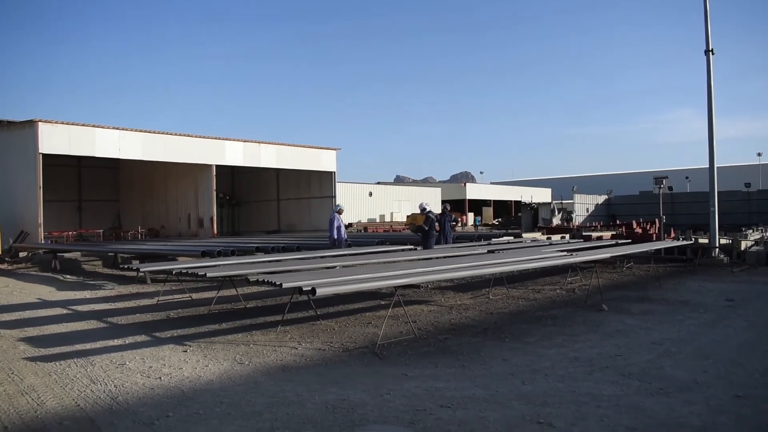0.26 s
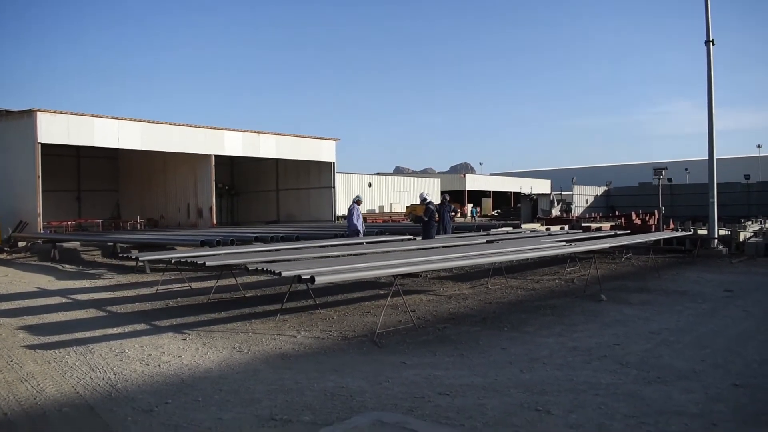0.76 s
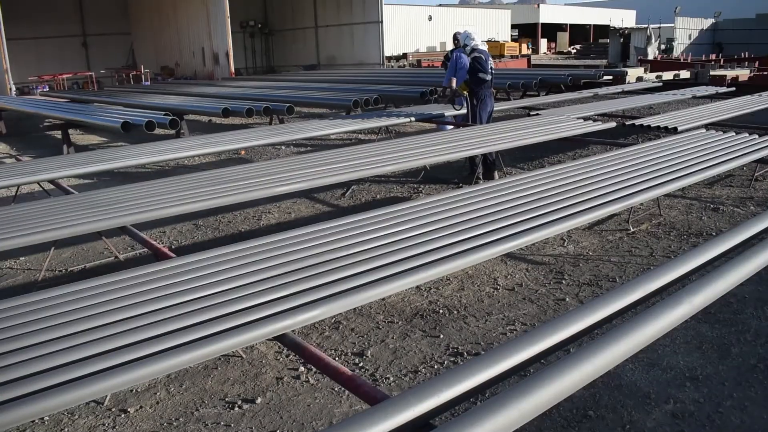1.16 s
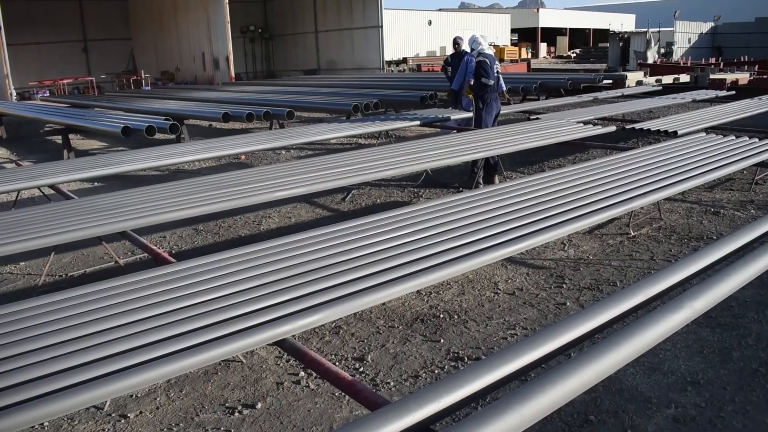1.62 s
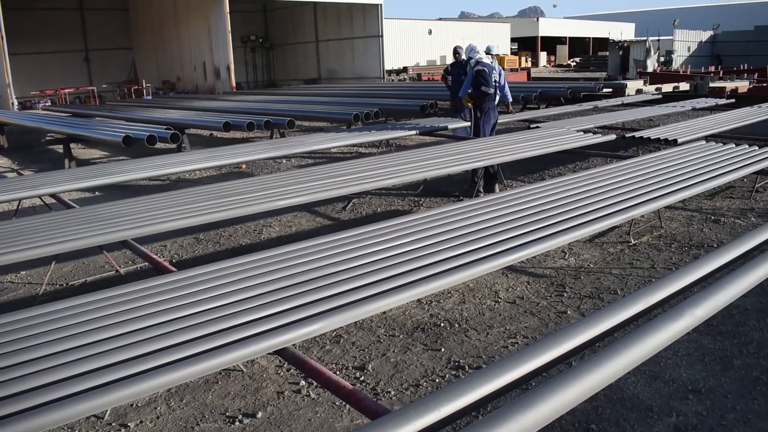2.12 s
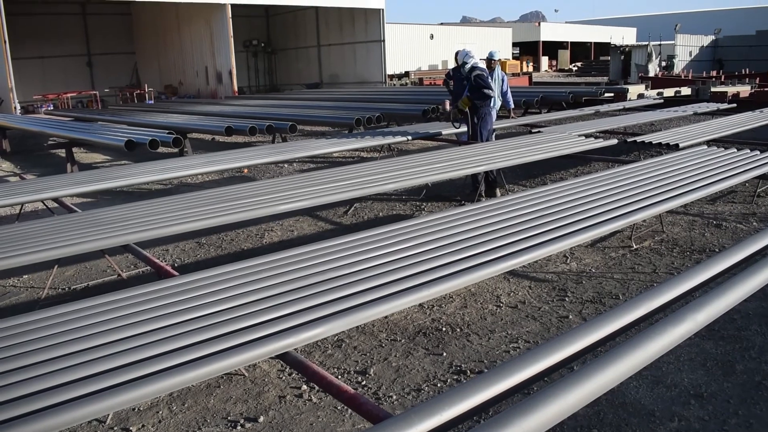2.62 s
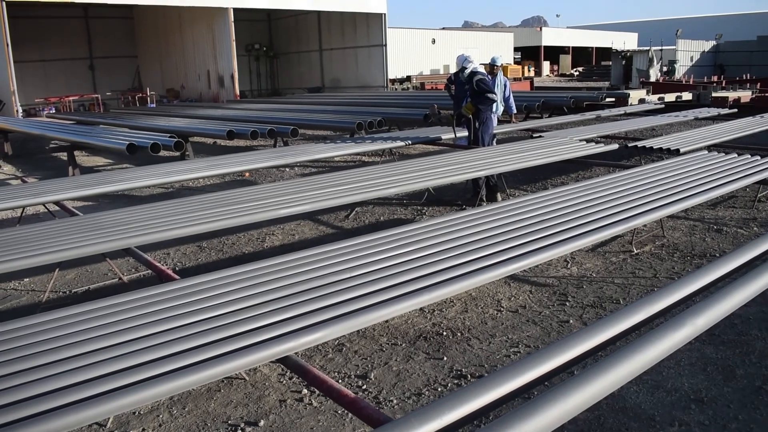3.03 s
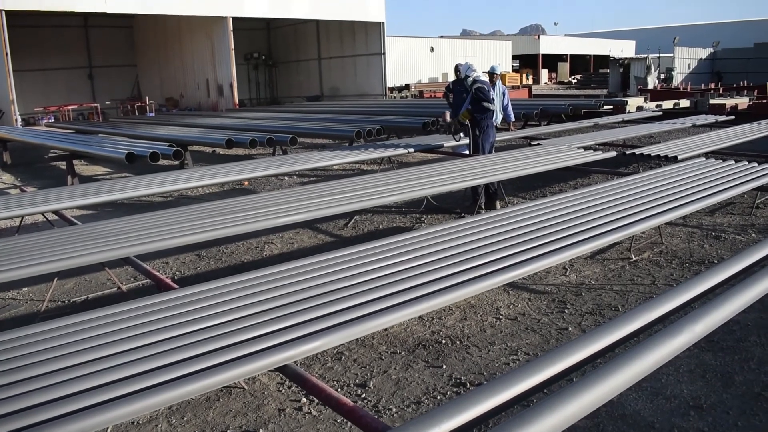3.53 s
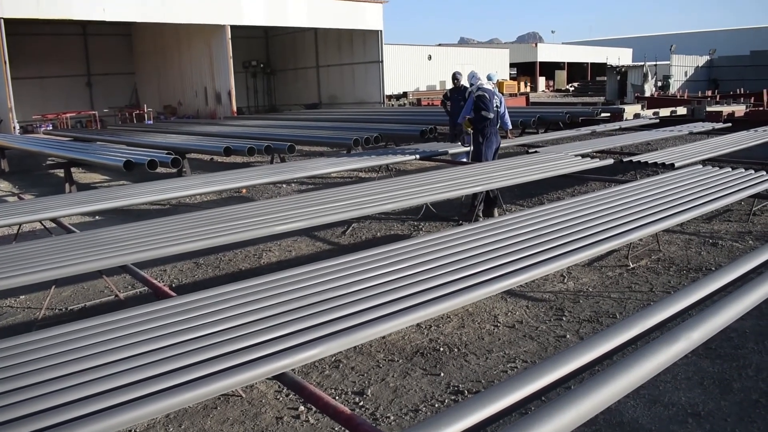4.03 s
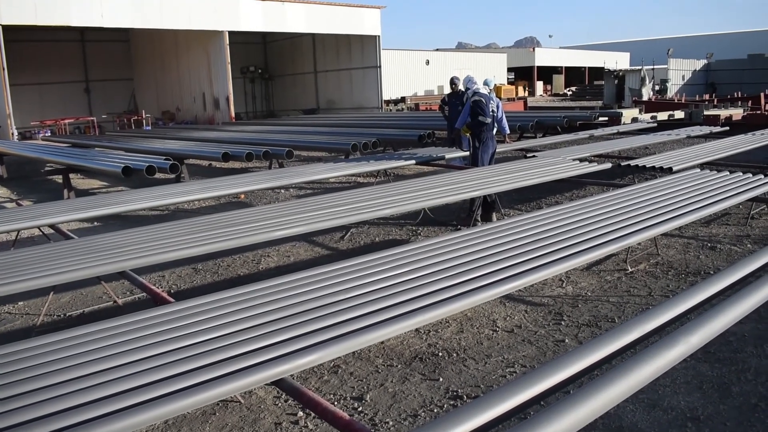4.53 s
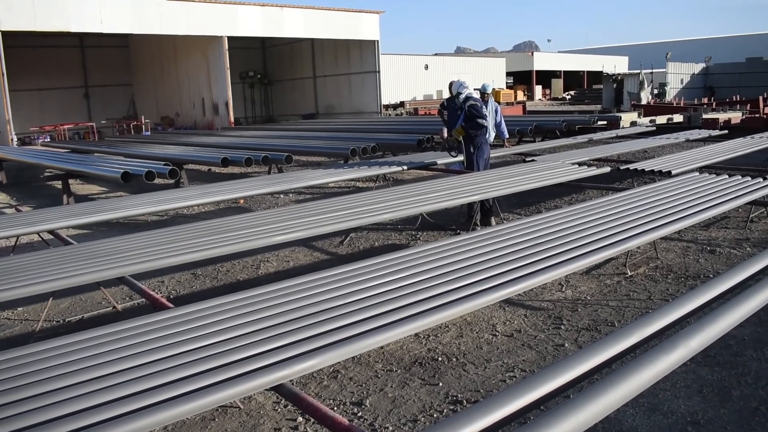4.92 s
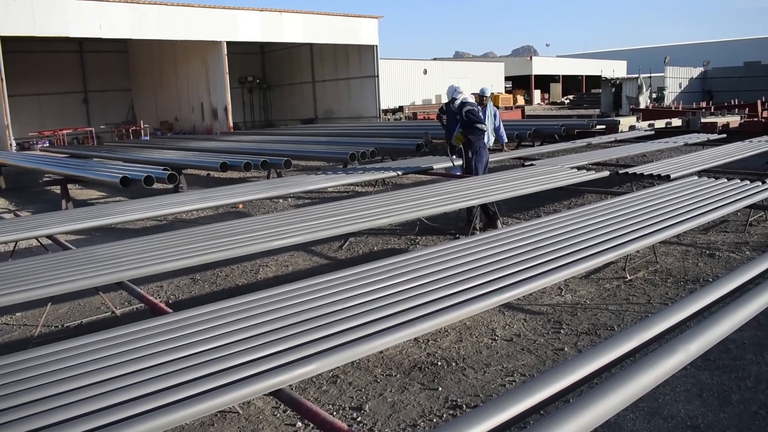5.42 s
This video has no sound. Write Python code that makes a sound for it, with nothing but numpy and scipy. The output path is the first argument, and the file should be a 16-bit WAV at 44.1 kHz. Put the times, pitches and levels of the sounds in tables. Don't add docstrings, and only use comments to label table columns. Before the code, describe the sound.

Low outdoor machinery drone and a few dull metal taps, a blink of silence, then continuous bright pressurized spraying over steel pipes.

```python
import sys
import numpy as np
from scipy import signal
from scipy.fft import dct
from scipy.io import wavfile
from scipy.ndimage import uniform_filter1d

SR = 44100
rng = np.random.default_rng(int(sys.argv[2]) if len(sys.argv) > 2 else 0)


def dump_mix(stems):
    frames = np.atleast_2d(stems).T
    limited = np.clip(frames, -1, 1)
    pcm = np.round(limited * 32767).astype(np.int16)
    wavfile.write(sys.argv[1], SR, pcm)


def voltage_ratio(decibels):
    exponent = np.asarray(decibels, float) / 20
    return 10 ** exponent


N = 249606
HOP = 256
CUT_S = 0.94

# pitch_hz, level_db (per Hz)
YARD_COLOUR = [(70, -15), (180, -3.5), (500, -5.5), (950, -6.5), (1260, -4), (2200, -12), (2900, -13),
               (3030, -18), (4000, -20.5), (6000, -15), (8600, -15), (9500, -25.5), (11000, -35.5),
               (15500, -43.4)]
# pitch_hz, width_hz, level_db, near_change_db
WHISTLES = [(309, 18, -62.5, 2), (348, 9, -55, -3.5), (442, 19, -59, -22), (771, 31, -58, 2.5),
            (2600, 40, -65, 0), (2840, 8, -62, -3)]
# db_per_db of aim, of strike, of mist
HUM_DUCK = [-.8, .85, -.25]
# db_per_db of aim, of strike, of mist
RUMBLE_DUCK = [-.27, .93, -.55]
# middle_s, low_hz, high_hz, level_db (against the band)
REFILLS = [(.095, 4700, 6400, -3), (.095, 6900, 8300, -2), (.095, 10400, 11800, -8), (.304, 4700, 6400, -5),
           (.304, 7600, 9700, -4), (1.396, 5160, 7600, -2), (1.396, 10300, 11800, -2),
           (1.442, 4700, 5800, -2), (1.442, 9600, 11800, -3), (3.625, 10300, 11800, -4),
           (5.320, 6930, 9700, -4), (5.483, 8300, 9700, -3)]
# middle_s, leak_db (of lost parts), first_tone_hz, second_tone_hz
THIN_MOMENTS = [(.528, -18, 7720, 5900), (.656, -19, 1110, 4560), (1.080, -18, 1660, 3130),
                (1.276, -18, 4680, 3230), (1.511, -13, 4850, 5700), (1.681, -18, 8900, 2360),
                (1.723, -21, 4830, 3260), (2.278, -15, 9620, 1800), (2.315, -16, 2150, 4350),
                (2.401, -25, 3150, 9070), (2.531, -22, 10370, 4560), (2.556, -18, 2290, 8600),
                (2.746, -25, 3140, 4200), (2.915, -20, 2260, 4770), (3.021, -20, 3300, 2270),
                (3.213, -11, 4670, 2836), (3.232, -28, 2130, 1600), (3.341, -14, 3090, 4800),
                (3.43, -20, 3920, 5070), (4.024, -18, 3920, 3280), (4.105, -44, 4400, 2140),
                (4.283, -17, 4410, 2420), (4.794, -15, 5640, 4800), (4.834, -20, 2340, 1675),
                (4.859, -18, 4890, 3650), (4.985, -16, 4400, 2250), (5.008, -25, 4770, 2120),
                (5.133, -24, 5380, 2390), (5.282, -19, 2950, 4820), (5.432, -18, 4530, 5260)]
LOUD_TONES_HZ = [2250, 3250, 3900, 4350, 4800, 5550, 8800]
# start_s, level_db, pitch_hz, fade_s (time to fall 60 dB)
KNOCKS = [
    (.581, -37, 1130, .04),
    (.596, -33, 1150, .04),
    (.654, -38, 1050, 0.044),
    (.811, -34, 1250, 0.049),
    (.814, -37, 704, 0.036),
    (.814, -37, 2420, .03),
]
# time_s, level_db
SCENE_CHANGE = [
    (.899, 0),
    (.8995, -21),
    (.927, -38),
    (.929, -70),
    (.954, -75),
    (.957, -43),
    (.966, -22),
    (.975, -13),
    (0.992, -3.5),
]
# time_s, aim_db (toward the microphone), strike_db (on the pipes), mist_db (thrown back)
GUN_SWEEP = [(1.0, .7, -2.4, 2.7), (1.3, .8, .2, 1.2), (1.5, -.7, 2.3, .6), (1.79, -1.8, -.2, -1.9),
             (1.99, -3.5, -1.3, -1.5), (2.29, -1.7, .9, -2.2), (2.48, 2.2, 1.8, 4.2), (2.77, 1.7, 1.3, 2.6),
             (2.93, 1.2, -2.3, .2), (3.28, 1.9, -1.9, -.1), (3.77, .3, 1.1, 3.2), (4.07, -.2, 2.4, -1.6),
             (4.26, -2.3, -.9, -1.9), (4.56, -2.4, -1.5, -4.9), (4.78, -1.3, .4, -3.6),
             (4.88, 1.4, 1.7, 2.2), (5.06, 2.7, -.7, 1.3), (5.65, 1.8, -1.1, -.5)]
# pitch_hz, level_db (per Hz)
JET_COLOUR = [(400, -31), (750, -19.5), (1220, -25.5), (1700, -13.5), (2260, -11.5), (3200, -11),
              (4100, -9), (5400, -11.5), (6300, -6), (6900, -2.12), (8400, -6.5), (9300, -14.5),
              (10600, -18.0), (15500, -36)]
# low_hz, high_hz, db_per_db of aim, of strike, of mist
REGIONS = [(770, 1400, -1.3, .4, .01), (1400, 2600, -.7, .65, -.08), (2600, 5900, -1.08, 1.08, .01),
           (9400, 11500, -1.05, .03, 1.05), (11500, 30000, -.27, .22, .35)]
# pitch_hz, width_hz, depth_db
JET_DIPS = [(2000, 72, -9), (2616, 175, -10.5), (3650, 120, -3), (4500, 130, -3.5), (5800, 175, -4),
            (9340, 220, -4.5), (11800, 300, -4), (12800, 200, -6)]
# pitch_hz, width_hz, level_db, db_per_db of aim, db_per_db of strike
PIPE_RINGS = [(6820, 350, 2.3, .4, -.3), (8300, 700, .01, -.15, .1), (10400, 280, -.5, .01, .3),
              (4220, 150, .6, -.8, .7), (4790, 120, 2.8, .4, -.3), (2235, 90, 1.4, .5, .2),
              (1730, 90, .4, .1, .01)]
WALK_DB_PER_S = [-.4, .7, -.5, -.3, .01, .3, -.2]
# time_s, pitch_hz, level_db
GAP_CROSSING = [
    (1.3, 10300, 0),
    (1.55, 10300, 4.5),
    (1.8, 10650, 4.5),
    (2.3, 9800, 4),
    (2.45, 9800, 0),
]


def evened(x):
    return x / np.sqrt(np.mean(x ** 2) + 1e-20)


def read(points, hz):
    f, value = np.transpose(points)
    return np.interp(np.log(hz + 1), np.log(f + 1), value)


def blotches(shape, bins, frames):
    over_time = uniform_filter1d(rng.standard_normal(shape), int(frames), 0)
    return evened(uniform_filter1d(over_time, int(bins), 1)).T


def pitch_and_time():
    return np.fft.rfftfreq(4 * HOP, 1 / SR), np.arange(N // HOP + 5) * HOP / SR


def bump(hz, middle_hz, width_hz):
    return np.exp(-0.5 * ((hz - middle_hz) / width_hz) ** 2)


def hiss(field_db):
    a, b = rng.standard_normal(field_db.shape[::-1] + (2,)).T
    return signal.istft((a + 1j * b) * voltage_ratio(field_db), nperseg=4 * HOP, noverlap=3 * HOP)[1][:N]


def whistle(hz, width):
    noise = [1, 1j] @ rng.standard_normal((2, N))
    slow = signal.lfilter([1], [1, -np.exp(-np.pi * width / SR)], noise)
    return evened((slow * np.exp(2j * np.pi * hz * np.arange(N) / SR)).real)


def yard():
    hum_db, near_db, near_tilt_db, patchy_db, bass_db = -46, 1.5, 2.5, 2.0, -9.0
    duck_s, rev_s, rev_length_s, rev_db = 0.2, 4.53, 0.12, 4.5
    hz, t = pitch_and_time()
    now = np.arange(N) / SR
    near = now > CUT_S
    field = read(YARD_COLOUR, hz)[:, None] + patchy_db * blotches((len(t), len(hz)), 6, 18)
    field += bass_db * np.log2(95 / np.clip(hz, 10, 95))[:, None]
    far_power = (voltage_ratio(field) ** 2).mean()
    field += near_tilt_db * np.outer(np.log2(np.clip(hz, 200, 1000) / 400), t > CUT_S)
    duck_db, deep_db = np.array([HUM_DUCK, RUMBLE_DUCK]) @ sweep(t, duck_s)
    duck_db = duck_db + rev_db * bump(t, rev_s, rev_length_s)
    rumble_db = deep_db - duck_db
    field += np.outer(1 / (1 + (hz / 230) ** 4), rumble_db * (t > CUT_S))
    out = voltage_ratio(hum_db) * evened(hiss(field)) * np.sqrt((voltage_ratio(field) ** 2).mean() / far_power)
    for pitch_hz, width_hz, db, more_db in WHISTLES:
        out += voltage_ratio(db + near * more_db) * whistle(pitch_hz, width_hz)
    return out * voltage_ratio(near * (near_db + np.interp(now, t, duck_db)))


def refill(x):
    frame, frame_start = 1024, 122
    side, n, k = np.zeros(N), np.arange(2 * frame), np.arange(frame)
    k_hz = k * SR / (2 * frame)
    window = signal.windows.kaiser_bessel_derived(2 * frame, 4 * np.pi)
    for (s, lo, hi, db), noise in zip(REFILLS, rng.standard_normal((len(REFILLS), frame))):
        at = frame_start + frame * round((s * SR - frame_start) / frame - 1) + n
        band = k[(k_hz > lo) & (k_hz < hi)]
        phase = np.pi / frame * np.outer(n + (frame + 1) / 2, band + 1 / 2)
        waves = window[:, None] * np.cos(phase) * np.sqrt(2 / frame)
        local = np.sqrt(uniform_filter1d((x[at] @ waves) ** 2, size=16))
        side[at] += voltage_ratio(db) * waves @ (local * noise[band])
    return np.array([x + side, x - side])


def thin_out(x):
    taper_s, flatten, lift_db, tone_db, shy_db, hold, high_hz = 0.0155, 0.4, 3.5, 14.2, 2.0, 0.05, 9500
    scatter, chance, chance_per_db, chance_tone_db, clear_hz = 0.025, 0.58, 0.03, -2.5, 260
    survive_db, lower_per_db = 4.6, 0.14
    long_below_db, longer_s_per_db = -19, 0.0005
    x = x.copy()
    t = np.arange(-(SR // 24), SR // 24) / SR
    hz = np.linspace(0, SR / 2, len(t))
    draws = rng.random((len(THIN_MOMENTS), 2 + len(LOUD_TONES_HZ), 3)).transpose(2, 0, 1)
    for (s, leak_db, *sure_hz), turn, pick, slip in zip(THIN_MOMENTS, *draws):
        deep_db = max(long_below_db - leak_db, 0)
        chance_hz = np.array(LOUD_TONES_HZ) * (1 + scatter * (2 * slip[2:] - 1))
        clear = abs(chance_hz[:, None] - sure_hz).min(1) > clear_hz
        lucky = (pick[2:] < chance + chance_per_db * deep_db) & clear
        tone_hz = np.r_[sure_hz, chance_hz]
        share = np.r_[1, 1, lucky * voltage_ratio(chance_tone_db)]
        flat_s = longer_s_per_db * deep_db
        window = np.cos(np.pi / 2 * np.clip((abs(t) - flat_s / 2) / taper_s, 0, 1))
        middle = round(s * SR)
        at = slice(middle - len(t) // 2, middle + len(t) // 2)
        lines = dct(x[at] * window, norm="ortho")
        local = np.sqrt(uniform_filter1d(lines ** 2, 120))
        overall = np.percentile(local[hz < high_hz], 70)
        step = voltage_ratio(survive_db - lower_per_db * deep_db) * local ** flatten * overall ** (1 - flatten)
        size = np.interp(tone_hz, hz, np.sqrt(step * local)) * voltage_ratio(tone_db) * share
        tones = np.cos(2 * np.pi * (np.outer(t, tone_hz) + turn)) @ size
        tones *= np.sqrt(2 * len(t)) / window.sum()
        step *= voltage_ratio(shy_db * ((hz < 5900) | (hz > 8700)))
        strong = abs(signal.hilbert(lines)) > step * np.sqrt(2)
        kept = lines * np.where(strong, voltage_ratio(lift_db), voltage_ratio(leak_db))
        x[at] += window * (dct(kept, type=3, norm="ortho") + tones * window ** hold - x[at] * window)
    return x


def knocks():
    out, t = np.zeros(N), np.arange(3000) / SR
    for (s, db, hz, fade_s), rough in zip(KNOCKS, rng.standard_normal((len(KNOCKS), len(t)))):
        wobble = 0.14 * np.cumsum(uniform_filter1d(rough, size=9))
        ring = np.sin(2 * np.pi * hz * t + wobble) * (1 - np.exp(-t / 0.0013))
        out[round(s * SR):][:len(t)] += voltage_ratio(db - 60 * t / fade_s) * ring
    return out


def sweep(t, smooth_s=0.0):
    s, *controls = np.transpose(GUN_SWEEP)
    size = max(round(smooth_s / (t[1] - t[0])), 1)
    return np.array([uniform_filter1d(np.interp(t, s, c), size) for c in controls])


def jet():
    jet_db, patchy_db, broad_db, gust_db, streak_db = -20.25, 1.1, 0.87, 0.46, 1.7
    drift, thin_db = 0.015, -8.5
    hz, t = pitch_and_time()
    tall_hz = hz[:, None]
    controls = sweep(t)
    aim, strike, mist = controls
    field = np.zeros((len(hz), len(t)))
    for lo, hi, *follow in REGIONS:
        share = 1 / (1 + (lo / (hz + 1)) ** 12) / (1 + (hz / hi) ** 12)
        field += np.outer(share, follow @ controls)
    wander = 1 + drift * blotches((len(t), len(JET_DIPS)), 1, 60)
    for (dip_hz, width, db), move in zip(JET_DIPS, wander):
        field += db * bump(tall_hz, dip_hz * move, width)
    for (ring_hz, width, db, by_aim, by_strike), walk in zip(PIPE_RINGS, WALK_DB_PER_S):
        height = db + by_aim * aim + by_strike * strike + walk * (t - 3.3)
        field += height * bump(tall_hz, ring_hz, width)
    s, gap_hz, db = np.transpose(GAP_CROSSING)
    field += np.interp(t, s, db) * bump(tall_hz, np.interp(t, s, gap_hz), 120)
    bass_loss = thin_db * np.log2(1300 / np.clip(hz, 20, 1300))
    field += (read(JET_COLOUR, hz) + bass_loss)[:, None]
    core = field[(hz > 5900) & (hz < 9300)]
    field -= 10 * np.log10((voltage_ratio(core) ** 2).sum(0).mean())
    field += patchy_db * blotches((len(t), len(hz)), 4, 40)
    field += broad_db * blotches((len(t), len(hz)), 60, 12)
    field += streak_db * blotches((len(t), len(hz)), 2, 50)
    field += gust_db * blotches((len(t), 1), 1, 3)
    return voltage_ratio(4.5) * hiss(field + jet_db + aim) * (np.arange(N) > CUT_S * SR)


def scene():
    return np.tile(yard() + knocks() + jet(), (2, 1))


def top_cut(x):
    return signal.sosfilt(signal.butter(12, 15710, fs=SR, output="sos"), x)


def record(dry):
    low_edge_hz, top_edge_hz = 60, 16000
    s, db = np.transpose(SCENE_CHANGE)
    x = signal.sosfilt(signal.butter(2, low_edge_hz, "high", fs=SR, output="sos"), dry[0])
    x = thin_out(x) * voltage_ratio(np.interp(np.arange(N) / SR, s, db))
    x = signal.oaconvolve(x, signal.firwin(255, top_edge_hz, window=("kaiser", 9), fs=SR), "same")
    mix = refill(x)
    return top_cut(mix)


dry = scene()
out = record(dry)
dump_mix(out)
```